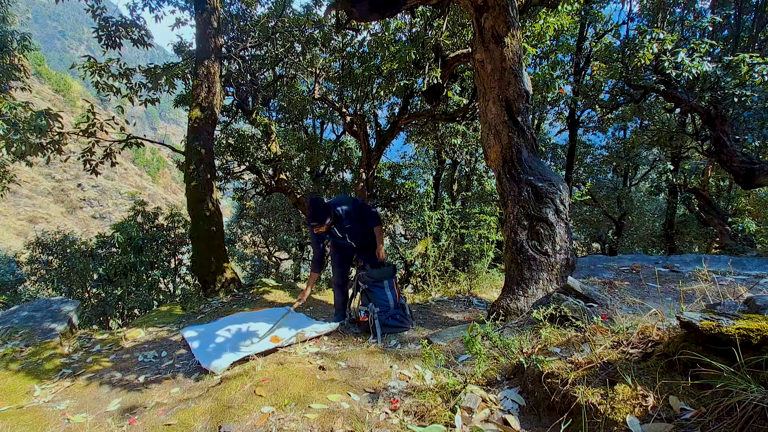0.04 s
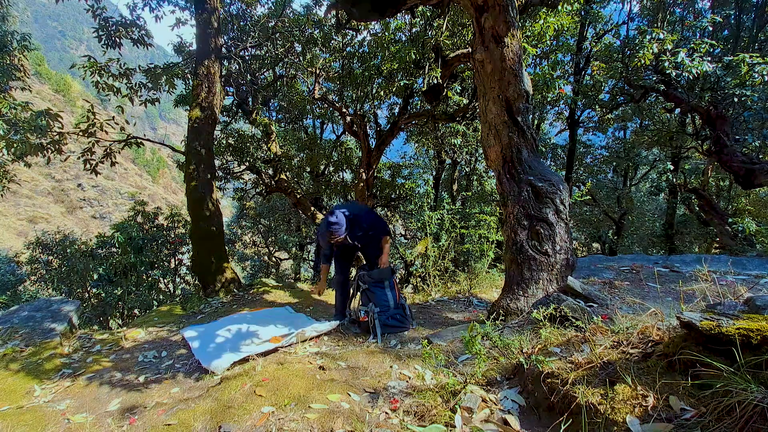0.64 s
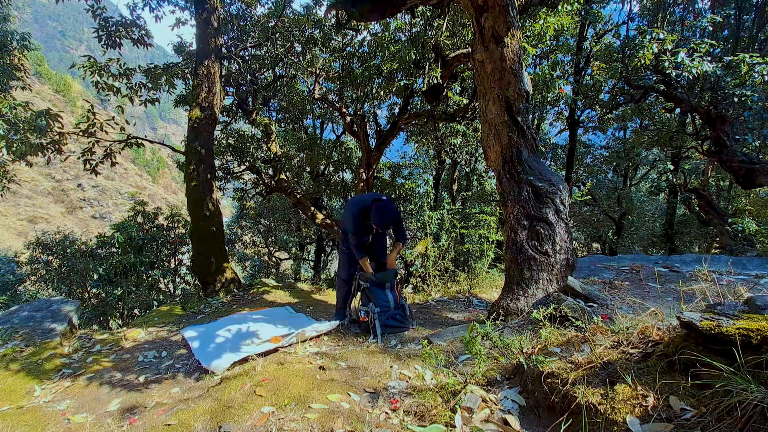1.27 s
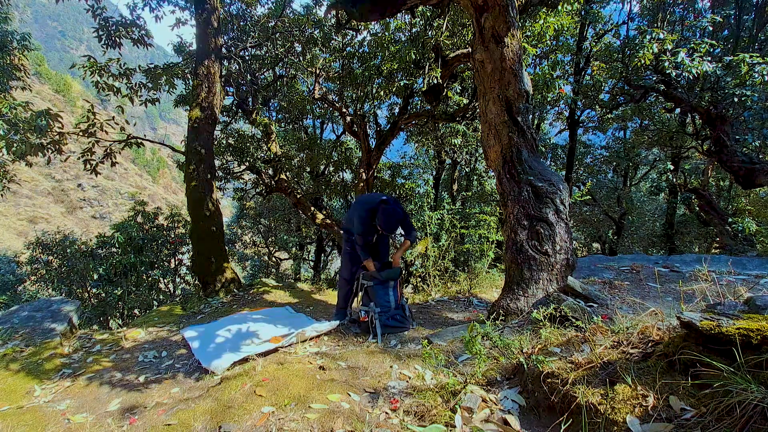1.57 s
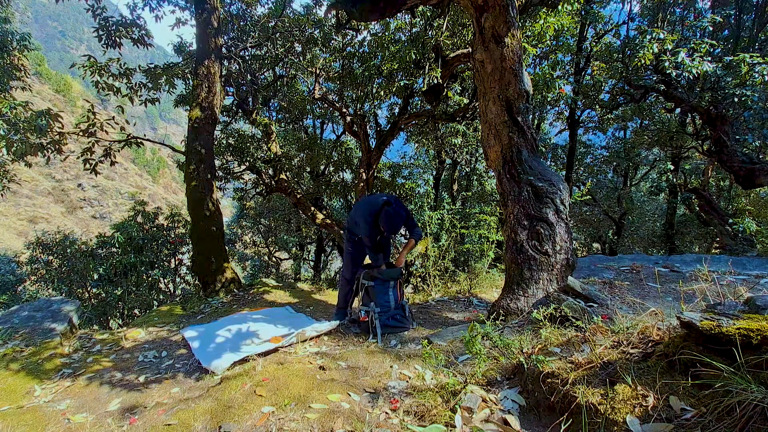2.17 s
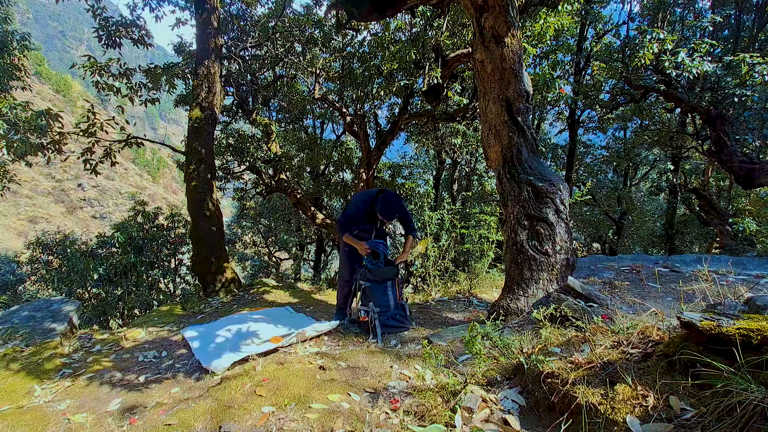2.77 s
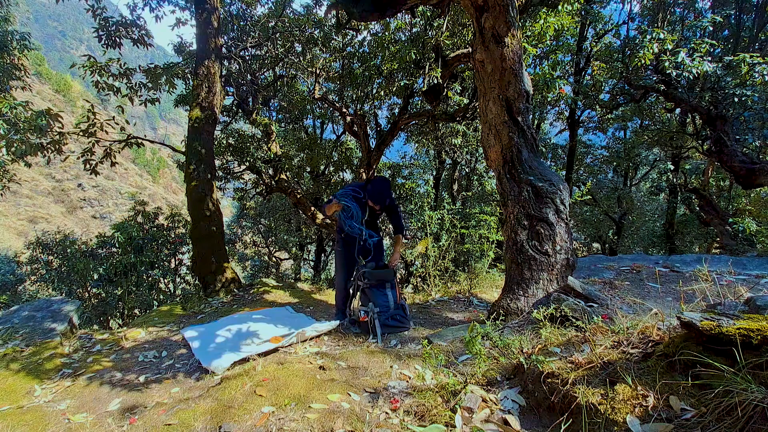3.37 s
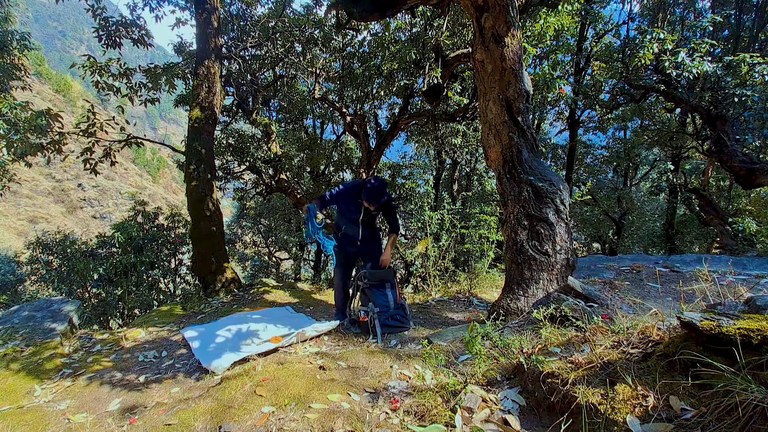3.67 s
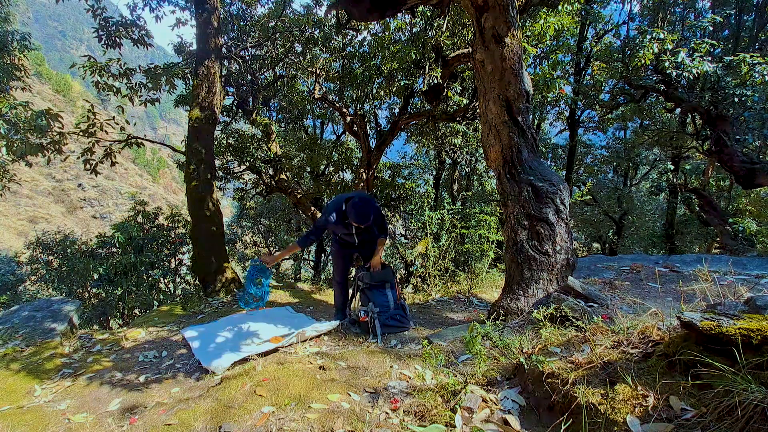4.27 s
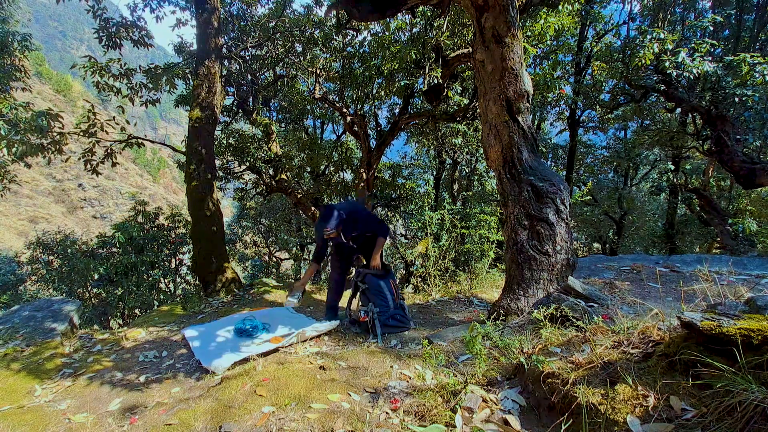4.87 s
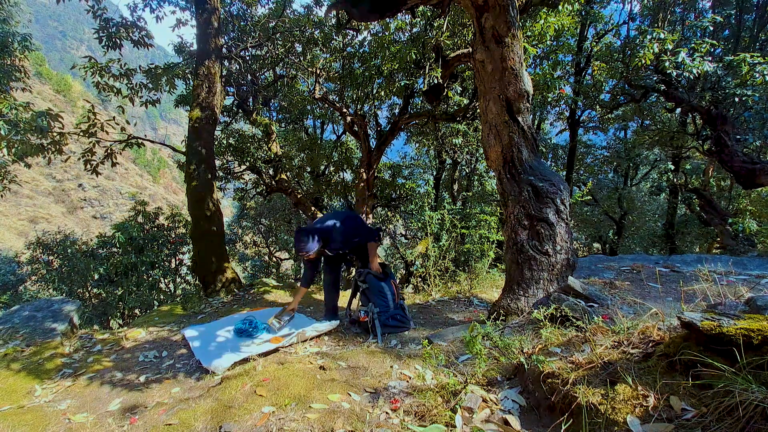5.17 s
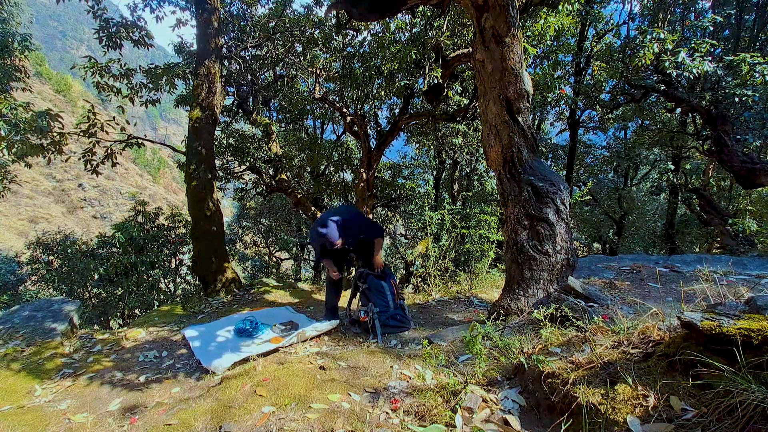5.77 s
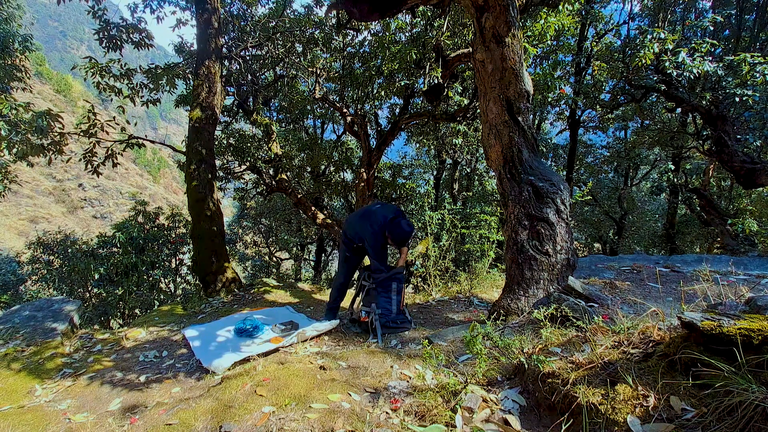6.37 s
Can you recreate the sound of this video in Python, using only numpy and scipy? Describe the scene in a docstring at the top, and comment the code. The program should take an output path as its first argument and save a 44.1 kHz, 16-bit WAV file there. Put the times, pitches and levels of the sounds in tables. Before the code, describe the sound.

Camping gear is unpacked in a quiet forest, ahead and slightly left of the microphone. Distant leaves hiss faintly throughout, and a light breeze buffets the microphone with low rumbles, strongest near 2.7 seconds. Nylon swishes softly at the start, and a bundle thuds on a mat at 0.5 seconds. From about 1.2 seconds hands rummage in a backpack with faint strap squeaks, the canvas rasping and tugging louder from 2.4 seconds. Something stiff scrapes out around 2.8, and a plastic buckle snaps sharply at 3.2. Around 4.5 a thin sack lands and crackles, followed by a small hard tap at 4.7 and light rustling. Thin fabric whispers off a tin, which is set down with a light clank and brief rattle at 5.5. At 6.4 a hollow container knocks clearly inside the pack, with a faint metallic jingle.

```python
"""Camping gear is unpacked in a quiet forest, ahead and to the left of a two-port microphone.
Nylon swishes and a bundle thuds on a mat. Hands rummage in a rucksack, straps squeak, something stiff
scrapes out and a buckle snaps. A crackly sack lands, a small piece taps the ground, a tin slips out of
thin fabric and is set down, and last a hollow container knocks and jingles inside the pack.
Throughout, a light breeze buffets each port over the hiss of far leaves."""
import sys
import numpy as np
from scipy import signal
from scipy.fft import rfft, irfft
from scipy.io import wavfile
from scipy.ndimage import uniform_filter1d

SR = 44100
rng = np.random.default_rng(int(sys.argv[2]) if len(sys.argv) > 2 else 0)


def master(y):
    """Save y as 16-bit WAV."""
    cut = np.clip(np.atleast_2d(y).T, -1, 1)
    pcm = np.round(cut * 32767)  # scale
    wavfile.write(sys.argv[1], SR, pcm.astype(np.int16))


N = 288369
TIME = np.arange(N) / SR
MAT_LAG_S = .00012  # the mat lies to the left, so the right port hears it later

# nylon slides on nylon, one row per arm stroke: peak_s, level_db, rise_s, fall_s
SWISHES = [(.185, -66.5, 0.023, 0.14), (.345, -64.5, .015, 0.059), (1.25, -64, 0.0815, 0.131),
           (1.56, -63, 0.15, 0.205), (2.19, -62.5, 0.058, 0.098), (2.51, -56.5, 0.12, 0.113),
           (2.68, -60.5, 0.034, 0.088), (2.82, -63.5, 0.088, 0.55), (3.8, -71, 0.0183, 0.083),
           (4.6, -66, 0.052, 0.427), (4.84, -67, 0.0195, 0.074), (5.0, -65.5, 0.043, 0.18),
           (6.39, -67, 0.4, .05)]
# airy nylon EQ: freq_hz, gain_db
NYLON_EQ = [(880, -20), (1500, -2.5), (2360, -8), (2580, -8), (3330, -6), (5730, -6), (6640, -3.5),
            (9010, -15.5), (15000, -13), (15800, -10)]
# a hand drags through the full pack: peak_s, level_db, rise_s, fall_s
DRAGS = [(.2, -58, .02, 0.0184), (1.52, -63.5, 0.26, 0.123), (2.08, -58, 0.056, 0.098),
         (2.515, -48.5, 0.14, 0.1), (2.72, -46, 0.1, 0.12), (2.87, -44.5, 0.096, 0.0756),
         (4.95, -64, 0.37, 0.21), (6.33, -63, 0.39, 0.19)]
# the cloth pulls taut or is bumped: start_s, level_db, t60_s
TUGS = [(1.904, -57, .05), (1.961, -50, 0.036), (2.024, -55.5, 0.025), (2.403, -44.5, 0.065),
        (2.46, -43, 0.04), (2.492, -39.5, 0.25), (2.575, -40, 0.041), (2.669, -40, 0.11),
        (2.785, -39, 0.087), (3.02, -50, 0.23), (3.052, -38, 0.044)]
# dark canvas EQ: freq_hz, gain_db
CANVAS_EQ = [(110, 3.5), (180, -0.5), (300, 0.5), (450, 2.5), (590, -4), (730, -2.5), (930, -10),
             (1250, -8), (1600, -12.5), (1850, -14), (2300, -21), (3400, -22.5), (6800, -34.5),
             (9000, -52.5)]


def rucksack(catch_db=3.0, tug_rise_s=.0021):
    """Nylon hisses as it slides, canvas rasps and jerks; both catch and let go together."""
    catching_db = catch_db * walk(55)
    slide = strokes(SWISHES) * undb(-2.5 + .47 * catching_db)
    nylon = colour(crinkle(spread_db=1.08) * slide, NYLON_EQ)
    drag = strokes(DRAGS) * undb(-3 + catching_db + 1.4 * walk(170))
    tugs = bursts([(s, db, tug_rise_s, t60) for s, db, t60 in TUGS], tail_db=-32, tail_t60=.2)
    canvas = colour(crinkle(spread_db=2) * np.hypot(drag, tugs), CANVAS_EQ)
    return nylon + canvas


# scrapes up the side of the pack: start_s, level_db, rise_s, t60_s
SCRAPES = [(2.786, -43, 0.0029, 0.207), (2.835, -41.5, 0.03, 0.165), (2.864, -47.5, 0.0096, 0.175),
           (2.908, -46.5, 0.0093, 0.16), (2.936, -42, 0.0061, 0.0187)]
# nasal scrape EQ: freq_hz, gain_db
SCRAPE_EQ = [(350, -35), (560, -4), (660, -12), (800, 3), (960, -13), (1130, 0), (1320, -19), (1650, -27.5),
             (2500, -19), (3400, -42), (9000, -47.5)]


def scrape():
    """Something stiff rubs along the pack in quick jerks."""
    return colour(crinkle(spread_db=0) * bursts(SCRAPES, tail_db=-31, tail_t60=.15), SCRAPE_EQ)


# straps and coated cloth catch: start_s, length_s, from_hz, to_hz, width_hz, level_db
SQUEAKS = [(1.251, 0.32, 879, 856, 150, -73), (1.509, 0.12, 1453, 2370, 900, -65),
           (2.04, 0.0323, 1195, 1736, 130, -67), (2.385, .17, 770, 657, 146, -49),
           (2.387, 0.21, 2396, 3066, 1810, -57.5)]


def squeaks():
    """Uneven stick-slip: a rough tone that glides with the speed of the pull."""
    out = np.zeros((2, N))
    for s, length, from_hz, to_hz, width_hz, db in SQUEAKS:
        start, count = int(s * SR), int(length * SR)
        phase = 2 * np.pi * np.cumsum(np.linspace(from_hz, to_hz, count)) / SR
        lowpass = signal.butter(2, width_hz / 2, fs=SR, output="sos")
        grip = signal.sosfilt(lowpass, rng.standard_normal((2, 2, SR // 2)))[..., -count:]
        tone = unit(grip[0] * np.cos(phase) + grip[1] * np.sin(phase))
        out[:, start:start + count] += undb(db) * np.sqrt(np.hanning(count)) * tone
    return out


# the buckle springs open: start_s, level_db, rise_s, t60_s
SNAPS = [(3.147, -57, 0.00223, 0.045), (3.1715, -28, 0.005, 0.066)]
# plastic crack EQ: freq_hz, gain_db
BUCKLE_EQ = [(150, -17.5), (430, -18.5), (530, -8.5), (650, -10.5), (760, -3.5), (890, -13), (1030, -6.5),
             (1150, -2.5), (1280, -6), (1420, -9.5), (1540, -15), (1850, -20), (4200, -17.5), (5400, -24.5),
             (6800, -18.5), (9200, -32), (15500, -26.5)]
# ring of the prongs: pitch_hz, gain_db, t60_s
BUCKLE_MODES = [(780, -18.5, 0.1), (1030, 3.5, 0.054), (1256, -19, 0.045), (1590, -4, 0.0934),
                (2640, -12, 0.13), (4090, -18, 0.19), (4270, -24, 0.232)]


def buckle():
    """Hard plastic prongs snap free and ring, with a short shiver of strap after them."""
    crack = colour(rng.standard_normal((2, N)) * bursts(SNAPS, tail_db=-11, tail_t60=.26), BUCKLE_EQ)
    releases = [(s + rise / 2, db) for s, db, rise, _ in SNAPS]
    return crack + ring(releases, BUCKLE_MODES)


# knocks against other gear: start_s, ring_db, scuff_db, scuff_t60_s
KNOCKS = [(6.409, -37.5, -42.5, 0.017), (6.42, -20, -38.5, 0.074), (6.4395, -21.5, -47, 0.063),
          (6.452, -47, -45.5, 0.263), (6.495, -66, -46, 0.0445)]
# hollow body: pitch_hz, gain_db, t60_s
HOLLOW_MODES = [(216.2, -16.5, 0.16), (387, -8, 0.068), (450, 1, 0.065), (598, -14, 0.02),
                (736, -19.5, 0.065), (1380, -27.5, .1), (1489, -26, 0.11)]
# dull scuff EQ: freq_hz, gain_db
SCUFF_EQ = [(100, -16), (210, 3.5), (400, -2.5), (750, -8.5), (1100, -12), (1500, -11.5), (2300, -19),
            (4500, -19.5), (7000, -25), (9500, -31.5), (14500, -29.5)]
# jolts of a small metal fitting: start_s, level_db
JINGLES = [(6.412, -68), (6.423, -51.5), (6.453, -60.5), (6.463, -50.5), (6.496, -55)]
# its bright ring: pitch_hz, gain_db, t60_s
JINGLE_MODES = [(5060, -7, 0.34), (8150, -8.5, .1), (8600, -10, 0.14), (10670, -11, 0.11),
                (11810, -9, 0.174), (13850, -6, 0.11), (14200, -6, .1)]


def hollow_container():
    """A container knocks inside the pack and its metal fitting jingles."""
    knocks = struck(KNOCKS, HOLLOW_MODES, SCUFF_EQ, rise_s=.00216, tail_db=-12, tail_t60=.47, buzz_db=2.4)
    return knocks + ring(JINGLES, JINGLE_MODES)


# the tin touches down, tips and is let go: start_s, ring_db, rattle_db, rattle_t60_s
TIN_HITS = [(5.479, -38, -44.5, 0.137), (5.608, -57, -71, .05), (5.648, -54.5, -63.5, 0.31)]
# metal walls: pitch_hz, gain_db, t60_s
TIN_MODES = [(646, -15, 0.253), (745.3, -13, 0.17), (998, -3, 0.166), (1020, -10.5, 0.138),
             (1335, -17, .15), (1550, -16, 0.354), (1746, -14.5, 0.245), (2680, -12.5, 0.264),
             (3450, -5.5, 0.13), (3850, -25.5, .12), (4730, -11, .14), (4960, -23, 0.16), (6900, -14, 0.09),
             (8820, -13, 0.062), (12500, -23.5, 0.09), (12000, -22.5, 0.13)]
# bright rattle EQ: freq_hz, gain_db
RATTLE_EQ = [(450, -15), (700, -7), (1000, -5), (1700, -11), (2150, -10), (2650, -4), (3050, -9),
             (3450, -2), (3700, -6.5), (5000, -10.5), (8500, -19.5), (10200, -24), (12000, -17.5),
             (15500, -23)]
# nudges along the mat: start_s, level_db, rise_s, t60_s
NUDGES = [(5.55, -60, 0.0083, 0.9), (5.645, -48, 0.0135, 0.22)]
# cavity EQ: freq_hz, gain_db
CAVITY_EQ = [(400, -44), (575, -31), (640, 3), (700, -20), (780, -16.5), (950, -18), (1150, -22),
             (1350, -20), (2200, -45), (6000, -50.5)]


def tin(rock_gap_s=.019, rock_loss_db=5):
    """A tin lands and rocks on its rim, each contact weaker; its hollow hums as it is nudged."""
    s, ring_db, rattle_db, t60 = TIN_HITS[0]
    rocks = [(s + k * rock_gap_s, ring_db - k * rock_loss_db, rattle_db - k * rock_loss_db, t60)
             for k in range(1, 5)]
    clank = struck(TIN_HITS + rocks, TIN_MODES, RATTLE_EQ,
                   rise_s=.00084, tail_db=-13, tail_t60=.94, buzz_db=2)
    hum = colour(crinkle(spread_db=2) * bursts(NUDGES, tail_db=-25, tail_t60=.2), CAVITY_EQ)
    return clank + hum


# soft impacts: start_s, level_db, rise_s, t60_s
THUDS = [(.4595, -40, 0.0029, 0.06), (.463, -38.5, 0.00082, 0.063), (.47, -42, 0.0022, 0.042)]
# padded EQ: freq_hz, gain_db
BUNDLE_EQ = [(100, -9), (190, -4.5), (270, -3), (370, -9), (470, -8), (590, -9), (780, -8), (1100, -10.5),
             (1400, -9), (1780, -9.5), (2300, -10.5), (4500, -19.5), (7000, -26.5), (9500, -34.5),
             (15500, -32)]
# short boom: pitch_hz, gain_db, t60_s
THUD_MODES = [(258, 3.5, 0.0465), (578, 3.5, 0.055), (1777, -2, 0.11)]


def bundle():
    """A bundle thuds down; the mat and the contents boom briefly."""
    thud = colour(crinkle(spread_db=2) * bursts(THUDS, tail_db=-8.5, tail_t60=.29), BUNDLE_EQ)
    return thud + ring(THUDS, THUD_MODES)


# folds give way: peak_s, level_db, rise_s, fall_s
COLLAPSES = [(.485, -54.5, 0.058, 0.0568), (4.497, -40, 0.038, 0.044)]
# the sack touches the mat, then its load lands: start_s, level_db, rise_s, t60_s
CRUMPLES = [(4.428, -45.5, 0.0015, 0.121), (4.54, -35.5, 0.0017, 0.022)]
# full-range crumple EQ: freq_hz, gain_db
SACK_EQ = [(90, 4.5), (160, -2), (350, -1), (560, 0.5), (660, -2.5), (830, 2), (1100, -5.5), (1700, -9.5),
           (2700, -13.5), (3800, -8), (5000, -10.5), (7000, -14.5), (10200, -28.5), (12500, -19.5),
           (15800, -26)]


def stuff_sack():
    """A thin sack crackles as it collapses under its load, fold after fold."""
    folds = strokes(COLLAPSES) * undb(.76 * walk(220))
    landing = bursts(CRUMPLES, tail_db=-11.5, tail_t60=.27)
    return colour(crinkle(spread_db=2.5) * np.hypot(folds, landing), SACK_EQ)


# fabric ticks: start_s, level_db
CREASES = [(4.432, -39.5), (4.463, -43.5), (4.515, -40), (4.852, -53), (4.989, -53), (5.628, -55)]
# crisp tick EQ: freq_hz, gain_db
CREASE_EQ = [(400, -5), (1100, -0.5), (2500, -2), (4000, -3), (7000, -1), (9500, -22), (15500, -29.5)]


def creases(rise_s=.0013, t60_s=.011):
    """Stiff creases flip over, each with a tick."""
    flips = bursts([(s, db, rise_s, t60_s) for s, db in CREASES], tail_db=-27, tail_t60=.235)
    return colour(rng.standard_normal((2, N)) * flips, CREASE_EQ)


# one light tap: start_s, level_db
TAPS = [(4.7125, -42.5)]
# its dry ring: pitch_hz, gain_db, t60_s
TAP_MODES = [(826.4, -4.5, 0.091), (885, 0, 0.034), (2300, -12, .015)]


def tap():
    """A small hard piece hits the ground and rings briefly."""
    return ring(TAPS, TAP_MODES)


# fabric slips: peak_s, level_db, rise_s, fall_s
SLIPS = [(5.3, -63.5, 0.025, 0.086), (5.43, -59.5, 0.079, .07)]
# whispery EQ: freq_hz, gain_db
SLEEVE_EQ = [(1200, 0), (3000, -5.5), (5000, 0), (7000, -3.5), (9000, -8), (11000, -8), (15500, -7.5)]


def sleeve():
    """Thin fabric slides off the tin on its way down."""
    return colour(crinkle(spread_db=2), SLEEVE_EQ) * strokes(SLIPS)


# gusts: peak_s, level_db, half_length_s, left_minus_right_db
GUSTS = [(0.0, -55.5, 0.055, 4.5), (0.465, -53.5, 0.195, 4), (0.805, -57.5, 0.17, 1.5),
         (1.496, -45.5, 0.2056, 1.5), (1.913, -50.5, 0.028, -14), (2.091, -48.5, 0.0655, 2),
         (2.604, -45, 0.22, 9), (3.3, -56, 0.13, -10), (3.58, -46.5, 0.1, 21), (4.049, -51, 0.067, 3),
         (4.556, -56.5, 0.087, 9), (4.962, -47.5, .17, 0), (6.313, -51, 0.16, 19)]
# wind rumble EQ: freq_hz, gain_db
RUMBLE_EQ = [(15, -40), (30, -7), (55, 4), (90, -3.5), (150, -19), (300, -34), (700, -61)]
# the strongest eddies: centre_s, level_db, pitch_hz, left_minus_right_db
EDDIES = [(0.871, -35.5, 62, 31), (1.313, -34, 57, -30), (1.438, -31, 74.3, 10.5), (1.531, -28, 54.4, 22),
          (2.682, -22.5, 81.3, 16), (2.72, -19, 71.4, 25), (2.799, -34, 53.6, -20.5),
          (2.904, -33.5, 69, -32), (3.529, -30, 60.9, 35), (3.588, -24, 64, 39), (4.832, -31.5, 72.4, 37),
          (6.359, -35, 57.4, 32.5)]


def breeze(calm_db=-62.5, calm_pan_db=3.5, flutter_db=3.4, eddy_cycles=.715):
    """Gusts swell and flutter on each port; an eddy is a brief pressure swing, mostly on one."""
    power = (undb(calm_db) * pan(calm_pan_db)) ** 2
    for s, db, half_s, pan_db in GUSTS:
        power = power + (strokes([(s, db, half_s, half_s)]) * pan(pan_db)) ** 2
    flutter = undb(3.5 + flutter_db * np.array([walk(14), walk(18)]))
    out = colour(rng.standard_normal((2, N)), RUMBLE_EQ) * np.sqrt(power) * flutter
    for s, db, hz, pan_db in EDDIES:
        near = np.abs(TIME - s) < .1
        cycles = (TIME[near] - s) * hz
        swing = np.sin(2 * np.pi * cycles) / np.cosh(2 * cycles / eddy_cycles)
        out[:, near] += undb(db) * pan(pan_db) * swing
    return out


# forest bed EQ: freq_hz, gain_db
FOREST_EQ = [(71, -22), (120, -13.5), (200, -13.5), (272, -15.5), (426, -23), (544, -26.5), (615, -30.5),
             (667, -26.5), (724, -29), (1000, -26.5), (2410, -39), (4360, -37.5), (6700, -37),
             (9290, -49.5), (15800, -47.5)]


def forest(level_db=-66, swell_db=.8):
    """Far leaves make a wide hiss that swells a little."""
    hiss = colour(rng.standard_normal((2, N)), FOREST_EQ) * undb(level_db + swell_db * walk(2.6))
    return ports(hiss, scatter_hz=610)


def struck(hits, modes, eq, rise_s, tail_db, tail_t60, buzz_db):
    """A container rings at each blow; loose contact makes it buzz while its contents chatter."""
    chatter = bursts([(s, db, rise_s, t60) for s, _, db, t60 in hits], tail_db, tail_t60)
    buzz = unit(undb(buzz_db * walk(350)))
    return ring(hits, modes) * buzz + colour(crinkle(spread_db=1.5) * chatter, eq)


def ring(blows, modes, spread_db=2.7):
    """Each blow rings an object's modes in the mid channel; the upper ones depend on where it lands."""
    out = np.zeros((2, N))
    for s, db, *_ in blows:
        start = int(s * SR)
        t = TIME[:min(N - start, SR // 2)]
        for hz, mode_db, t60 in modes:
            detune, spot = rng.standard_normal(2)
            cycles = hz * t * (1 + .0101 * detune)  # the grip shifts each mode a little
            gain = undb(db + mode_db + spread_db * spot * min(hz / 2000, 1))
            attack = np.minimum(2 * cycles, 1)  # the push takes half a swing
            decay = np.exp(-np.log(1000) * t / t60)
            out[0, start:start + len(t)] -= gain * attack * np.sin(2 * np.pi * cycles) * decay
    return out


def bursts(rows, tail_db, tail_t60):
    """Envelope of contacts: each swells, dies fast and leaves a weaker tail."""
    power = np.zeros(N)
    for s, db, rise, t60 in rows:
        start = int(s * SR)
        t = TIME[:min(N - start, SR)]
        fall = -np.log(1000) * np.maximum(t - rise, 0)
        shape = np.minimum(t / rise, 1) * (np.exp(fall / t60) + undb(tail_db) * np.exp(fall / tail_t60))
        power[start:start + len(t)] += (undb(db) * shape) ** 2
    return np.sqrt(power)


def strokes(rows):
    """Envelope of movements: each speeds up and slows down along a bell."""
    power = np.zeros(N)
    for s, db, rise, fall in rows:
        away = (TIME - s) / np.where(TIME < s, rise, fall)
        power += undb(db) ** 2 * np.exp(-2 * np.minimum(away ** 2, 20))
    return np.sqrt(power)


def crinkle(spread_db):
    """Mid and side streams of tiny slips whose size changes about every millisecond."""
    size = undb(spread_db * np.minimum(rng.exponential(size=N // 40 + 1), 5))
    return unit(rng.standard_normal((2, N)) * np.repeat(size, 40)[:N])


def colour(x, eq, size=8192):
    """Minimum-phase EQ of unit energy through (freq_hz, gain_db) points."""
    hz, db = np.transpose(eq)
    bin_hz = np.arange(size // 2 + 1) * SR / size
    log_gain = np.log(undb(np.interp(np.log(bin_hz + 1), np.log(hz), db)))
    cepstrum = irfft(log_gain)[:size // 2]
    cepstrum[1:] *= 2
    response = irfft(np.exp(rfft(cepstrum, size)))
    return signal.fftconvolve(x, response[None] / np.linalg.norm(response), axes=1)[:, :N]


def ports(pair, lag_s=0., scatter_hz=6000, left_db=5.6):
    """Mid and side to stereo, louder on the left: the ports share the bass, scattered treble differs."""
    hz = np.arange(N // 2 + 1) * SR / N
    mid, side = rfft(pair)
    side = side * np.tanh(hz / scatter_hz)
    gain = undb(np.array([[left_db], [-left_db]]) / 2)
    delay = np.exp(-2j * np.pi * hz * lag_s)
    return gain * irfft(np.array([mid + side, (mid - side) * delay]), N)


def pan(db):
    """Left and right gains whose mean is 1."""
    left = 2 / (1 + undb(-np.atleast_1d(db)))
    return np.array([left, 2 - left])


def walk(rate_hz):
    """Smooth random drift of rms 1."""
    hold = int(SR / rate_hz)
    steps = np.repeat(rng.standard_normal(N // hold + 1), hold)
    return unit(uniform_filter1d(uniform_filter1d(steps, hold), hold)[:N])


def undb(db):
    """Decibels to gain."""
    return 10 ** (np.asarray(db) / 20)


def unit(x):
    """Scale to rms 1."""
    return x / np.sqrt(np.mean(x ** 2))


def scene():
    """The pack and the mat at the two ports, over breeze and forest."""
    pack = rucksack() + scrape() + squeaks() + buckle() + hollow_container()
    mat = tin() + bundle() + stuff_sack() + creases() + tap() + sleeve()
    return ports(pack) + ports(mat, MAT_LAG_S) + breeze() + forest()


def record(dry):
    """A steep high cut takes off the very top."""
    cutoff_hz = 15900
    return signal.sosfilt(signal.ellip(10, .2, 80, cutoff_hz, fs=SR, output="sos"), dry)


dry = scene()
out = record(dry)
master(out)
```